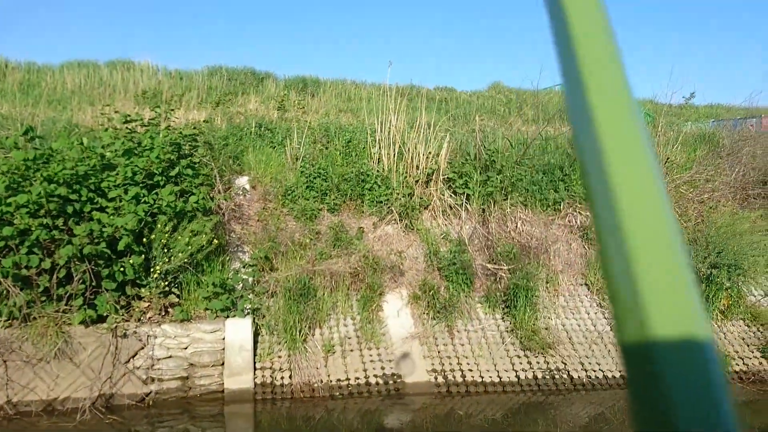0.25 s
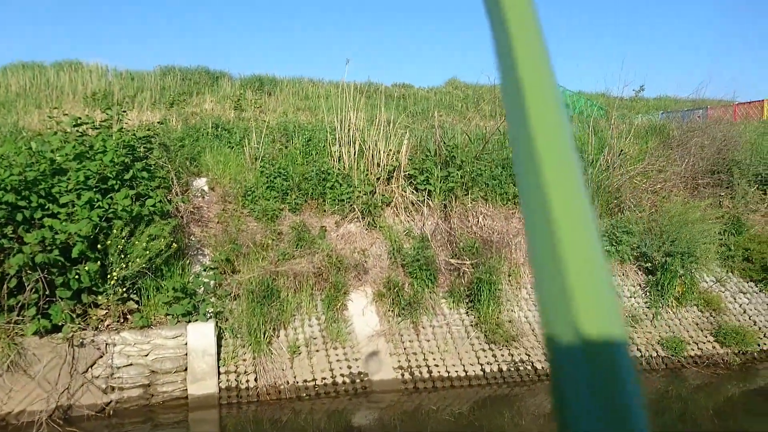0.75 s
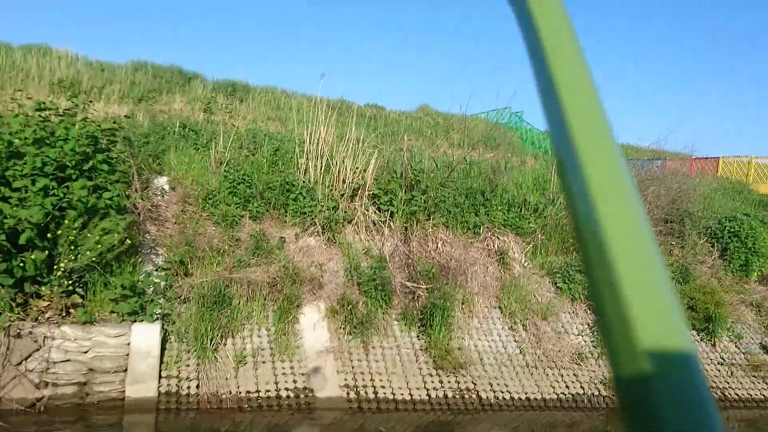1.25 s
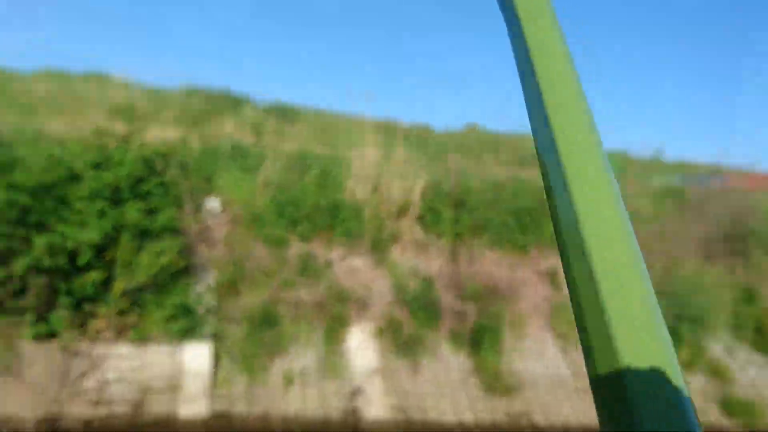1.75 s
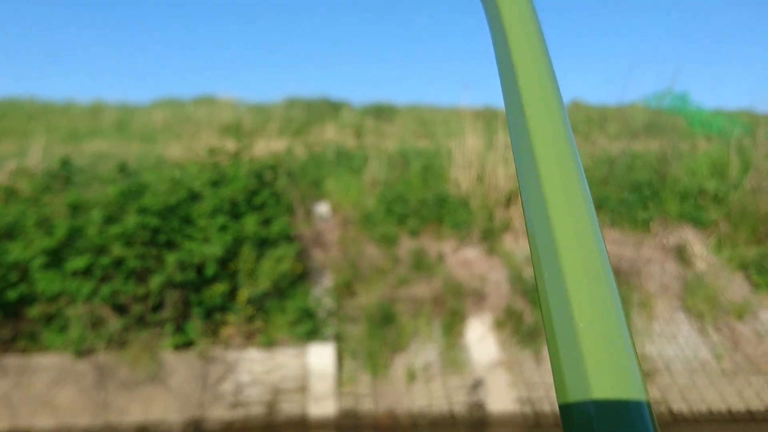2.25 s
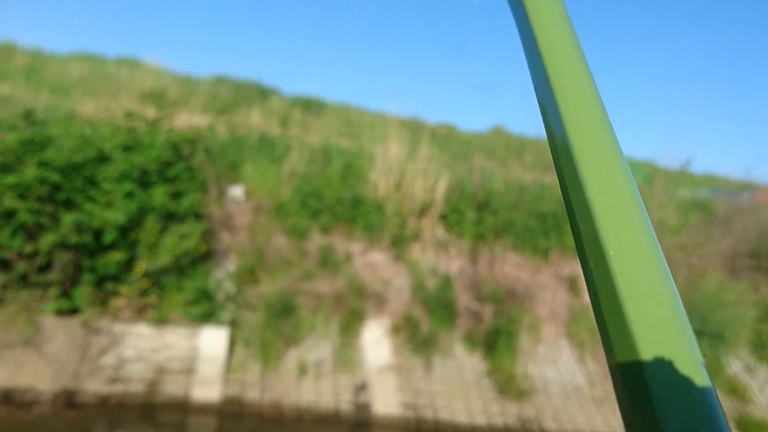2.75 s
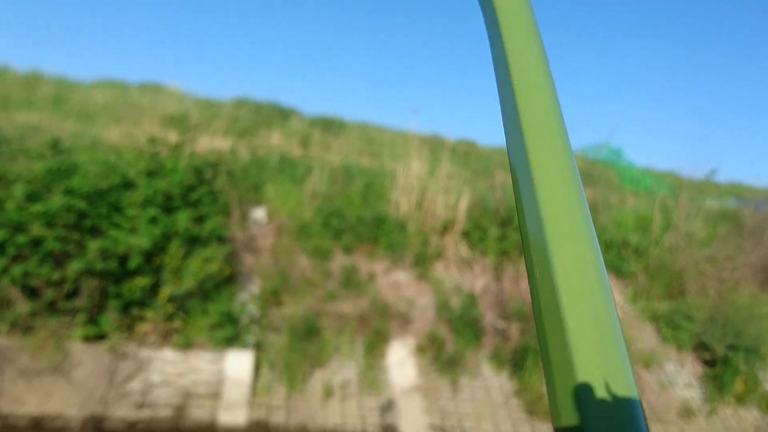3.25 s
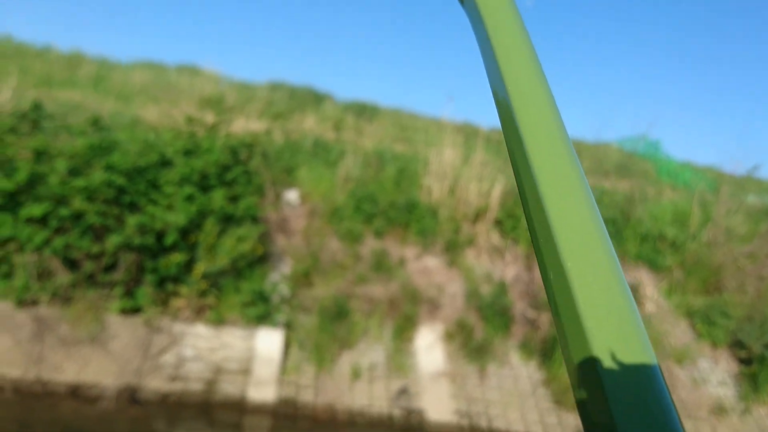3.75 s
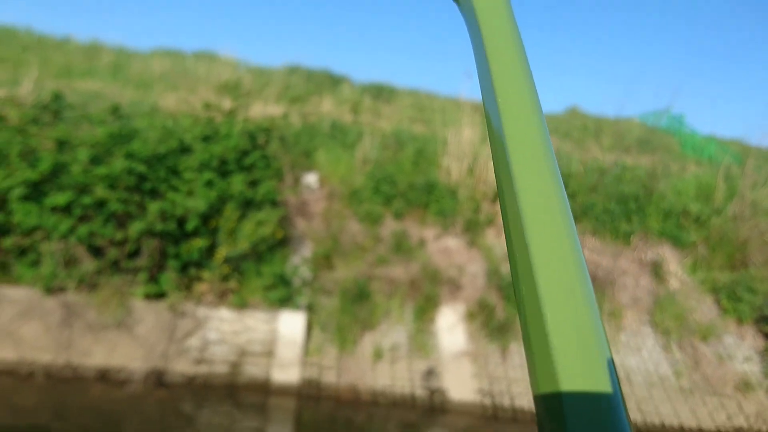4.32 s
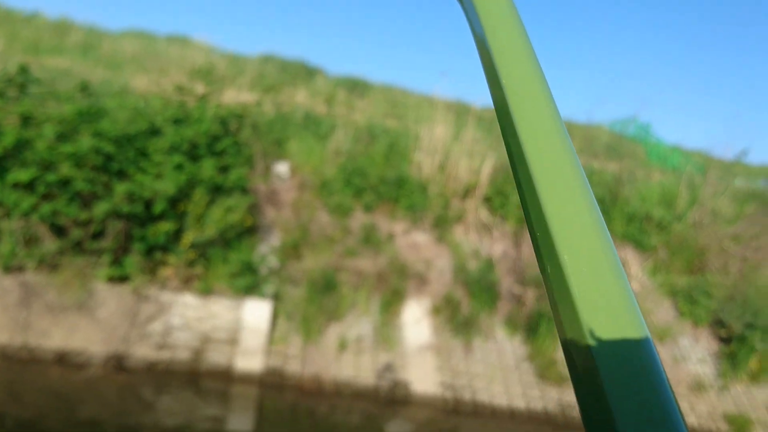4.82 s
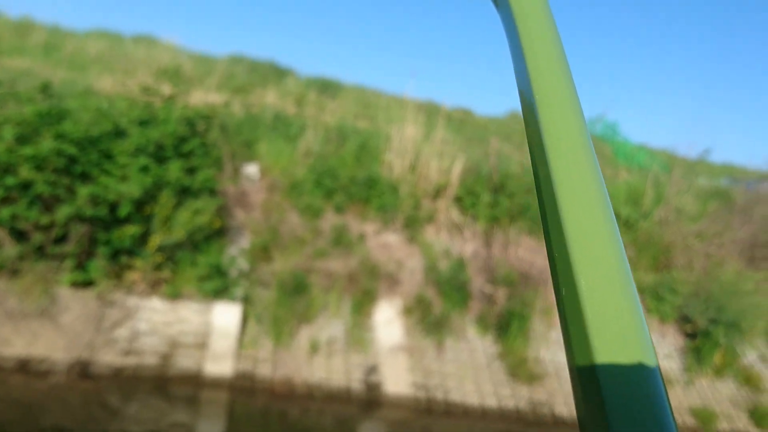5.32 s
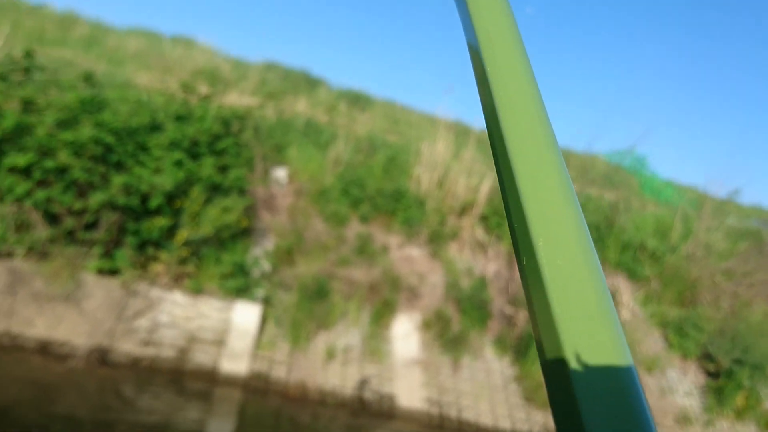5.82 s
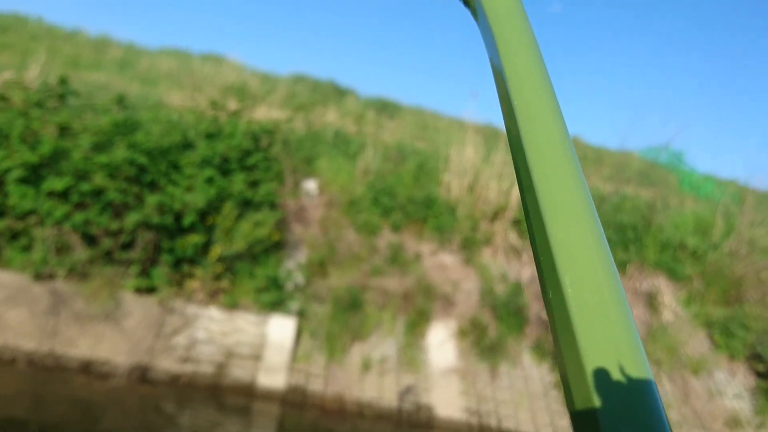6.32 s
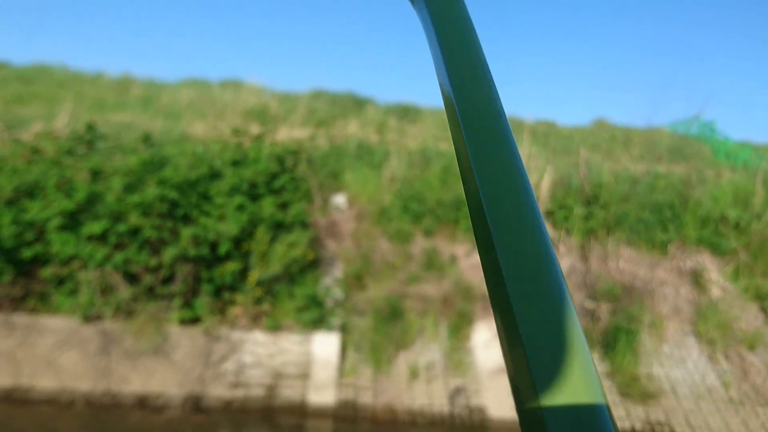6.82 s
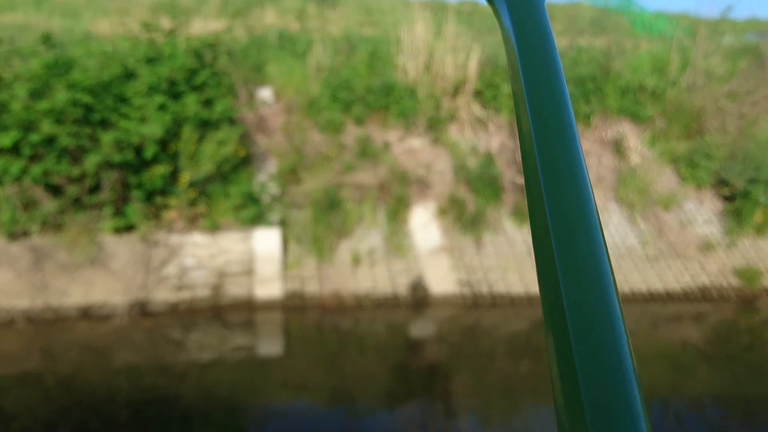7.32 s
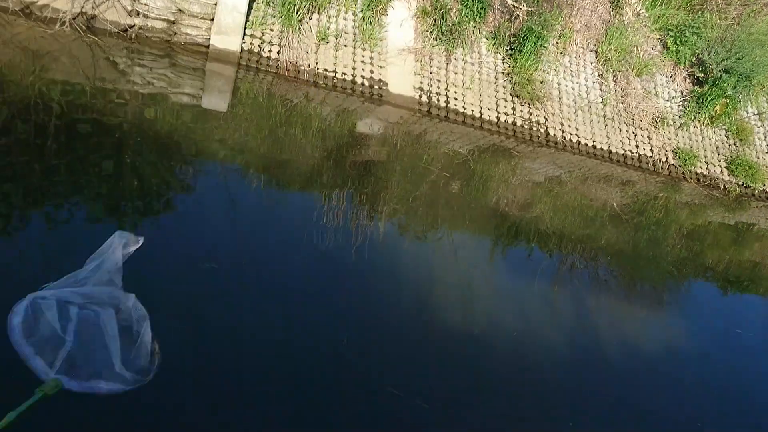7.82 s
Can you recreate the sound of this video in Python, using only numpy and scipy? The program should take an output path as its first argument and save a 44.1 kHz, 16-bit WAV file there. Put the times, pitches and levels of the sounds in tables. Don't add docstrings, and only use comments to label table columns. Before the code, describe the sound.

On an open channel bank, a stiff mesh net and dry stems crackle close on the left. Sharp snaps open the scene, return hardest near two and six and a half seconds, with brief airy swishes and sparse quiet gaps between. Dull handling knocks tap the right side of a handheld stereo microphone. Far traffic hums low throughout.

```python
import sys
import numpy as np
from scipy import signal
from scipy.fft import rfft, irfft, next_fast_len
from scipy.io import wavfile
from scipy.ndimage import uniform_filter1d, map_coordinates

SR = 44100
rng = np.random.default_rng(int(sys.argv[2]) if len(sys.argv) > 2 else 0)


def decibels_to_gain(level_db):
    exponent = np.asarray(level_db, float) / 20
    return 10 ** exponent


def generate_wav(signal):
    frames = np.transpose(np.atleast_2d(signal))
    scaled = np.clip(frames, -1, 1) * 32767
    pcm = np.round(scaled).astype(np.int16)
    wavfile.write(sys.argv[1], SR, pcm)


N = 355666

# peak_s, level_db, swell_s and fade_s (each over 60 dB)
PULLS = [(.086, -46, .25, .45), (.34, -47, .5, .5), (.474, -42.5, .9, .6), (.626, -48, .03, .4),
         (.815, -48, .04, .62), (1.05, -66.5, .9, 5.5), (1.517, -57, .3, 2.5), (1.686, -43, .03, .95),
         (1.96, -47.5, .7, .52), (2.97, -70, 2.1, .8), (3.03, -47.5, .2, .7), (3.3, -67, 1.1, .15),
         (3.67, -68, .12, 1.5), (3.801, -54, .18, .4), (3.874, -45, .04, 1.1), (4.03, -44.5, .65, .9),
         (4.225, -51, .6, .12), (4.3, -74, .5, 2.2), (4.866, -57.5, .15, 1.3), (5.01, -54.5, .6, .6),
         (5.1, -53, .6, .16), (5.902, -60, .75, 1.9), (6.071, -63, .6, 1.2), (6.29, -56, .5, .75),
         (6.422, -54.5, .03, .8), (6.476, -40, .03, .55), (6.64, -54, .9, .5), (7.175, -68, .2, .3)]
# frequency_hz, density_db
CREASE_SPECTRUM = [(1200, -49.5), (2200, -30), (3600, -21.5), (5000, -16.5), (6600, -7), (8100, -4),
                   (9900, -5.5), (11100, 2.5), (12500, -3.5), (15800, -5)]
# frequency_hz, left_minus_right_db
RUSTLE_LEAN = [(60, 2.5), (180, 0), (550, 1.5), (1650, 13.5), (4970, 10.5), (15000, 10)]
# time_s, level_db
TRAFFIC_LEVEL = [(0, -58), (.6, -59), (1.1, -56), (1.5, -59), (1.8, -55.5), (2.2, -57), (3.2, -58.5),
                 (4.1, -58.5), (4.4, -55), (5.6, -55.5), (5.9, -57), (6.5, -56.5), (6.9, -56), (7.2, -54),
                 (7.28, -49), (7.45, -54), (7.75, -52.5), (8.06, -55)]
# frequency_hz, density_db
RUMBLE_SPECTRUM = [(25, -39), (40, -18.5), (60, -4.5), (85, 0), (118, -6.5), (180, -9.5), (260, -19.5),
                   (400, -51.5)]
# frequency_hz, density_db
HUM_SPECTRUM = [(120, -25), (200, -2), (243, -3), (497, -5.5), (811, -16.5), (920, -17.5), (1080, -25.5),
                (1500, -25.5), (1950, -49), (3300, -120)]
# frequency_hz, density_db
AIR_SPECTRUM = [(590, -38.5), (1000, -1.5), (1250, -4), (1380, -9), (1640, -3), (5040, -4.5), (6490, -2.5),
                (10500, -11), (15800, -13)]
# frequency_hz, correlation
TRAFFIC_LIKENESS = [(41, .62), (121, 0.81), (550, 0.24), (1650, .3)]
# start_s, peak_db
GRIPS = [(.0784, -38.5), (.1204, -38), (.5678, -37), (.7156, -40), (.7713, -35), (.8288, -33), (.931, -37),
         (1.0126, -37.5), (1.5215, -41), (1.68, -36), (2.3179, -40), (2.8522, -34.5), (3.0984, -41),
         (3.2908, -37), (3.3991, -39.5), (3.7582, -39.5), (3.9671, -38), (4.5753, -41), (5.008, -41),
         (5.191, -37), (5.9565, -38.5), (6.0351, -41), (6.3204, -41), (6.5507, -35), (6.6595, -39),
         (6.9227, -38.5), (7.2849, -38), (7.347, -40.5), (7.4465, -31), (7.5143, -38.5)]
# start_s, peak_db
TREMORS = [(.1798, -42), (.3609, -42), (.4825, -44), (1.2648, -44), (1.5998, -42.5), (1.7059, -42),
           (1.7964, -44), (1.8903, -44), (1.9634, -41.5), (2.0711, -45), (2.2281, -45), (2.3549, -42.5),
           (2.4627, -44), (2.6683, -42), (2.7486, -42.5), (3.4808, -44), (4.0588, -43), (4.1688, -42),
           (4.707, -42), (4.8778, -43.5), (5.3789, -46), (5.7784, -43), (5.8047, -44), (6.4716, -41),
           (6.7821, -41.5), (7.045, -42.5), (7.1025, -46.5), (7.388, -41), (7.63, -46), (7.6996, -42)]
# pitch_hz, level_db, t60_s
HOUSING_MODES = [(389.8, 3, 0.029), (170.6, 5.5, 0.02), (113.2, -2, 0.12), (920, -24, 0.016)]
# start_s, peak_db, t60_s, low_body_db, mid_body_db
STEM_BREAKS = [(.0814, -10.5, .024, -29, -6), (.2708, -26.5, .016, -34, -13), (.4927, -24, .022, -45, -12),
               (.599, -27, .0056, -31, -9), (.8115, -23.5, .012, -38, -13), (1.632, -20.5, .02, -38, -8),
               (1.681, -5, .02, -31, -4.5), (1.7078, -14, .026, -30, -3), (1.8953, -24.5, .012, -30, -4.5),
               (1.9297, -23, .01, -28, -19), (3.0158, -8.5, .016, -25.5, -13), (3.869, -16, .06, -28, -7),
               (3.886, -13.5, .025, -28, -7.5), (3.9535, -18.5, .0065, -32, -6),
               (4.1585, -21, .024, -27.5, -5), (4.8496, -21.5, .027, -22.5, -6),
               (5.0644, -19, .012, -40, -13.5), (5.89, -27, .015, -37, -12.5), (6.225, -16, .02, -42, -16),
               (6.304, -18, .022, -36, -9), (6.421, -17, .024, -36, -11), (6.4711, -5, .026, -31, -6),
               (6.4819, -12.5, .03, -34, -4), (6.5009, -23, .017, -28, -6)]
# start_s, peak_db
KNOT_SLIPS = [(.352, -30), (.3884, -35), (.6342, -32), (.7169, -44), (1.7318, -28), (2.0152, -33),
              (3.0047, -36), (3.0348, -28), (3.7291, -40), (3.7613, -35), (3.9082, -32), (4.0301, -29),
              (4.1058, -34), (4.984, -37), (5.0232, -37), (5.0839, -33), (5.1215, -36.5), (5.9515, -52),
              (6.0368, -32), (6.0738, -31), (6.094, -41), (6.4424, -36), (6.605, -36), (6.6435, -40),
              (6.7138, -38)]
# start_s, peak_db
STEM_CATCHES = [(.6208, -30), (1.925, -32), (1.965, -33), (1.9955, -40), (2.1761, -56), (2.2365, -52),
                (2.9189, -49), (3.1873, -46), (3.2529, -42.5), (3.2886, -51.5), (3.968, -33), (4.2112, -33),
                (4.3774, -48.5), (4.5309, -45), (4.903, -37), (6.164, -50), (6.428, -36), (6.568, -37.5),
                (6.6587, -38), (6.6841, -36), (6.7891, -44), (7.9765, -45.5)]
# pitch_hz, width_hz
STEM_RESONANCES = [(1600, 2830), (6800, 3310), (11000, 3000), (14500, 1800)]
# frequency_hz, extra_left_minus_right_db
SNAP_COLOUR = [(1000, 1.5), (2200, -2.5), (5000, -6), (9000, -1.5), (13000, 4)]
# time_s, pitch_hz, level_db
SQUEAL_PATH = [
    (.85, 1710, -98),
    (.93, 1670, -81.5),
    (1.09, 1420, -80.5),
    (1.15, 1360, -95),
]
# start_s, level_db, t60_s, left_minus_right_db
SWISHES = [(1.422, -55, 0.15, -1), (1.468, -43.5, .55, -1), (2.805, -48.5, .25, -1),
           (3.656, -45.5, 0.36, 1), (3.729, -55.5, 1.6, 0), (4.637, -52, 0.26, -4),
           (4.81, -66.5, 0.37, -9), (5.66, -64.5, 0.22, -1.5), (6.015, -53, 0.13, -4),
           (6.093, -53, 0.17, 0), (6.258, -44, 0.47, 0)]
# frequency_hz, density_db
SWISH_SPECTRUM = [(3000, -51), (4800, -24.5), (5600, -8), (6300, 0.5), (7000, 2.5), (8000, -3.5),
                  (9200, -16), (12500, -26.5), (15900, -38.5)]
# start_s, peak_db
AIR_PUSHES = [
    (1.68, -26.5),
    (3.871, -34.5),
    (6.4701, -26.5),
    (6.4826, -22.5),
    (7.26, -44),
]

PORT_LAG_S = 0.0002312
STEADY_TOP_HZ, TOP_HZ = 15950, 16900
REST_DB = -86
DULL_JERK_DB, DULL_DRAG_DB = 5, -2.5
DRAG_S, DRAG_FROM_DB, DRAG_SPAN_DB = .3, -66, 12
HUM_DB, HUM_FOLLOWS = -65, .3
WHINE_HZ, WHINE_DB, AIR_DB = 920.5, -82.5, -73
SNAP_PAN_DB, PAN_SCATTER_DB = 6.2, 1.5


def unit(x):
    return x / np.sqrt(np.mean(x ** 2) + 1e-20)


def along(points, hz):
    f, v = np.transpose(points)
    return np.interp(np.log(hz + 1), np.log(f + 1), v)


def curves(rows):
    s, *columns = np.transpose(rows)
    return [np.interp(np.arange(N) / SR, s, column) for column in columns]


def wobble(rate_hz):
    knots = rng.standard_normal(int(N * rate_hz / SR) + 4)
    return map_coordinates(knots, [np.arange(N) * rate_hz / SR])


def filtered(x, response):
    size = next_fast_len(N + 8192)
    return irfft(rfft(x, size) * response(np.fft.rfftfreq(size, 1 / SR)), size)[..., :N]


def ports(x, other, lag_s, loose):
    late = filtered(x + loose * other, lambda hz: np.exp(-2j * np.pi * hz * lag_s))
    return np.array([x - loose * other, late])


def diffuse(spectrum, likeness):
    def shares(hz):
        turn = np.arccos(np.clip(along(likeness, hz), -1, 1)) / 2
        return decibels_to_gain(along(spectrum, hz)) * [np.cos(turn), np.sin(turn)]
    mid, side = filtered(rng.standard_normal((2, N)), shares)
    return unit(np.array([mid + side, mid - side]))


def rustle():
    t = np.arange(0, N / SR + .01, .001)
    peak_s, db, swell, fade = np.transpose(PULLS)[:, :, None]
    each_db = db - 60 * np.maximum((peak_s - t) / swell, (t - peak_s) / fade)
    pull_db, ruling = each_db.max(axis=0), each_db.argmax(axis=0)
    slow = np.clip(swell[ruling, 0] / DRAG_S, 0, 1)
    drag = slow * np.clip((pull_db - DRAG_FROM_DB) / DRAG_SPAN_DB, 0, 1)
    dull_db = DULL_JERK_DB + (DULL_DRAG_DB - DULL_JERK_DB) * drag
    pull_db, dull_db = curves(np.transpose([t, pull_db, dull_db]))
    creases_per_s, grain_s = 1200, 0.00088
    strength = decibels_to_gain(np.minimum(5 * rng.exponential(size=N), 17))
    creases = (rng.random(N) < creases_per_s / SR) * strength
    gate = signal.lfilter([1], [1, -np.exp(-1 / (grain_s * SR))], creases)
    gate = (unit(gate) + 1.4) * decibels_to_gain(2.2 * wobble(40) + 1.7 * wobble(120))
    pair = gate * rng.standard_normal((2, N))
    bright = unit(filtered(pair, lambda hz: decibels_to_gain(along(CREASE_SPECTRUM, hz))))
    dull = filtered(bright, lambda hz: 1 / (1 + (hz / 7500) ** 6))
    level = (decibels_to_gain(REST_DB) + decibels_to_gain(pull_db)) * decibels_to_gain(-1.5)
    a, b = level * (bright + (decibels_to_gain(dull_db) - 1) * dull)
    stereo = ports(a, b, PORT_LAG_S, loose=0.86)
    return filtered(stereo, lambda hz: decibels_to_gain(.5 * along(RUSTLE_LEAN, hz) * [[1], [-1]]))


def bank():
    rumble_db, = curves(TRAFFIC_LEVEL)
    hum_db = HUM_DB + HUM_FOLLOWS * (rumble_db - rumble_db.mean())
    rumble = decibels_to_gain(rumble_db + .8 + 2.6 * wobble(11)) * diffuse(RUMBLE_SPECTRUM, TRAFFIC_LIKENESS)
    hum = decibels_to_gain(hum_db + 3 + 1.4 * wobble(8)) * diffuse(HUM_SPECTRUM, TRAFFIC_LIKENESS)
    whine_level = decibels_to_gain(WHINE_DB + 2 + 1.8 * wobble(6.6))
    whine = whine_level * np.sin(2 * np.pi * WHINE_HZ * np.arange(N) / SR + 1.3 * wobble(12))
    air = decibels_to_gain(AIR_DB + 2.5) * diffuse(AIR_SPECTRUM, [(1000, 0.091), (15000, 0.045)])
    return rumble + hum + whine + air


def taps():
    t, out = np.arange(SR // 6) / SR, np.zeros(N)
    start_s, db = np.transpose(GRIPS + TREMORS)
    at = np.round((start_s - .001) * SR).astype(int)
    sense = rng.choice([-1, 1], len(at))
    spread = rng.standard_normal((len(at), len(HOUSING_MODES)))
    for k, (hz, level_db, t60) in enumerate(HOUSING_MODES):
        blows = np.zeros(N)
        blows[at] = sense * decibels_to_gain(db + 1.8 * k * spread[:, k])
        decay = (-1) ** k * decibels_to_gain(level_db - 60 * t / t60)
        ring = decay * np.sin(2 * np.pi * hz * t) * (1 - np.exp(-t / 0.00071))
        out += signal.oaconvolve(blows, ring)[:N]
    return out * np.array([[.06], [1]])


def snaps():
    t, size = np.arange(SR // 6) / SR, 2 ** 13
    f = np.fft.rfftfreq(size, 1 / SR)
    bands = np.array([(-1) ** k * (1j * f * width / (hz * hz - f * f + 1j * f * width)) ** 2
                      for k, (hz, width) in enumerate(STEM_RESONANCES)])
    lag = np.exp(-2j * np.pi * f * [[0], [PORT_LAG_S]])
    port = lag * decibels_to_gain(along(SNAP_COLOUR, f) * [[.5], [-.5]]) / (1 + (f / 16000) ** 30)
    slips_of_knots = [row + (.02, -29, -12) for row in KNOT_SLIPS]
    catches = [row + (.027, -22, -5.5) for row in STEM_CATCHES]
    slips_per_s, grain_s = 1300, 0.00086
    out = np.zeros((2, N + SR))
    for start_s, db, t60, low_db, mid_db in STEM_BREAKS + slips_of_knots + catches:
        pan_db = SNAP_PAN_DB + PAN_SCATTER_DB * rng.normal()
        slips = (rng.random(len(t)) < slips_per_s / SR) * rng.random(len(t))
        slips[0] = 0.81
        gate = signal.lfilter([1], [1, -np.exp(-1 / (grain_s * SR))], slips) + 0.32
        own, scatter, after, other = rng.standard_normal((4, len(t)))
        burst = gate * decibels_to_gain(-60 * t / np.clip(t60, .004, .1))
        burst = burst / np.max(uniform_filter1d((burst * own) ** 2, size=44)) ** .5
        crack = burst * np.array([own - 0.53 * scatter, own + 0.32 * scatter])
        crack = crack * decibels_to_gain([[0], [-pan_db]])
        settle = gate * (1 - t / t[-1]) * decibels_to_gain(-28.5 - 60 * t / 0.56)
        settle = settle * np.array([after - .6 * other, 0.53 * (after + .6 * other)])
        tone = rfft(crack, size) * (decibels_to_gain([low_db + 8, mid_db + 7.5, 4, 2.5]) @ bands)
        tone += rfft(settle, size) * (decibels_to_gain([-5.5, 1.5, -3.5, -10]) @ bands) * (f < STEADY_TOP_HZ)
        out[:, round(start_s * SR):][:, :size] += decibels_to_gain(db) * irfft(tone * port)
    return out[:, :N]


def squeal():
    hz, db = curves(SQUEAL_PATH)
    return (db > -94) * decibels_to_gain(db) * np.sin(2 * np.pi * np.cumsum(hz) / SR)


def swishes():
    out, t = np.zeros((2, N)), np.arange(SR // 4) / SR
    noise = rng.standard_normal((2, N))
    hiss = unit(filtered(noise, lambda hz: decibels_to_gain(along(SWISH_SPECTRUM, hz))))
    for start_s, db, t60, pan_db in SWISHES:
        push = decibels_to_gain(db - 60 * t / t60) * (1 - np.exp(-t / .0015)) * np.sqrt(1 - t / t[-1])
        out[:, round(start_s * SR):][:, :len(t)] += push * decibels_to_gain([[pan_db / 2], [-pan_db / 2]])
    return out * ports(hiss[0], hiss[1], 0, loose=.3) * decibels_to_gain(2.6 * wobble(60))


def puffs():
    t, out = np.arange(SR // 10) / SR, np.zeros(N + SR)
    swing = 0.87 * np.sin(2 * np.pi * 110 * t) * decibels_to_gain(-60 * t / 0.023)
    suction = np.exp(-t / .0004)
    for start_s, db in AIR_PUSHES:
        out[round(start_s * SR):][:len(t)] += decibels_to_gain(db) * (swing - suction)
    return filtered(out[:N], lambda hz: 1 / (1 + 1j * hz / 1500)) * np.array([[1], [.3]])


def scene():
    steady = rustle() + bank() + squeal() + swishes()
    return filtered(steady, lambda hz: hz < STEADY_TOP_HZ) + taps() + snaps() + puffs()


def low_pass(x):
    return signal.sosfilt(signal.butter(12, 16970, fs=SR, output="sos"), x)


def record(dry):
    held = dry / (1 + np.abs(dry / .99) ** 6) ** (1 / 6)
    band = filtered(held, lambda hz: (hz < TOP_HZ) / (1 + (45 / (hz + 1)) ** 4))
    return low_pass(band - .001)


dry = scene()
out = record(dry)
generate_wav(out)
```